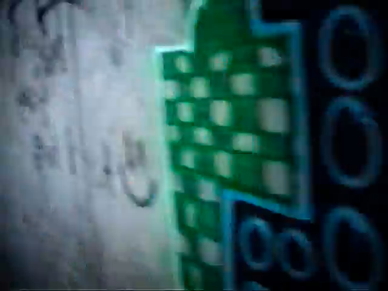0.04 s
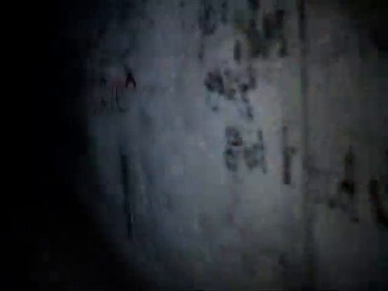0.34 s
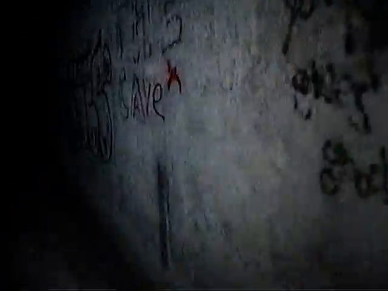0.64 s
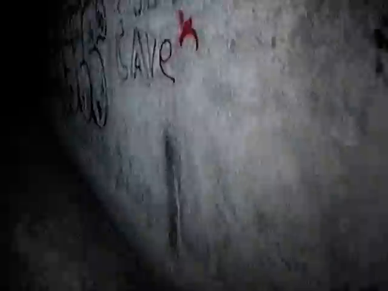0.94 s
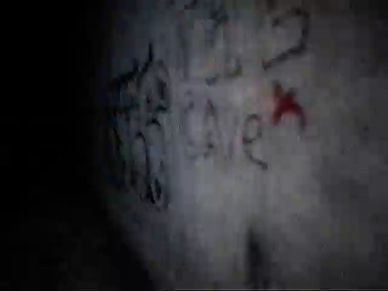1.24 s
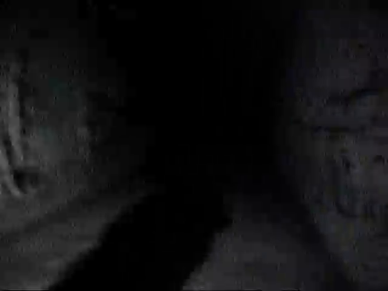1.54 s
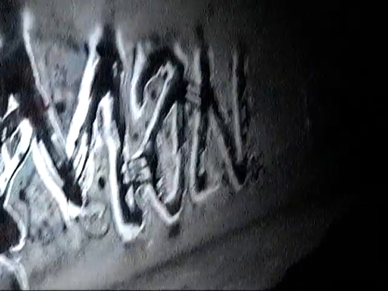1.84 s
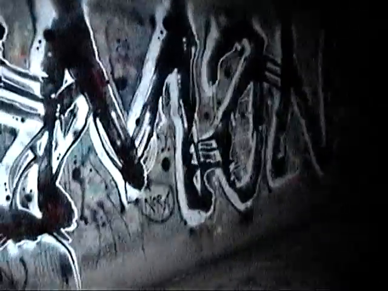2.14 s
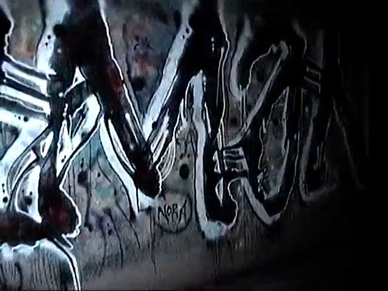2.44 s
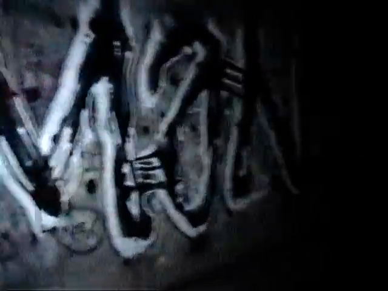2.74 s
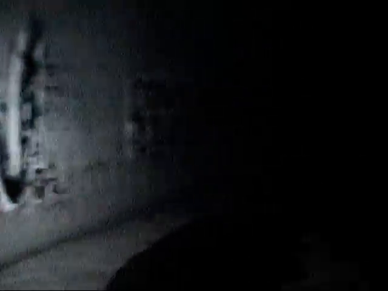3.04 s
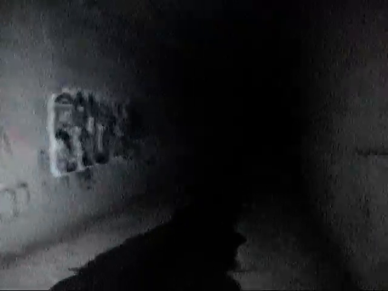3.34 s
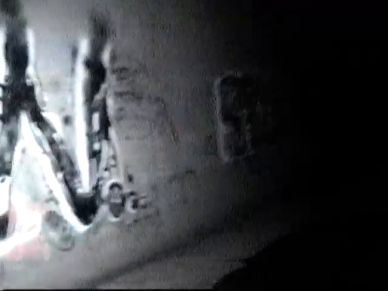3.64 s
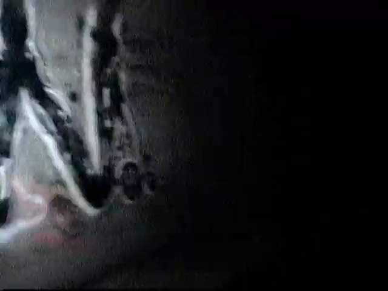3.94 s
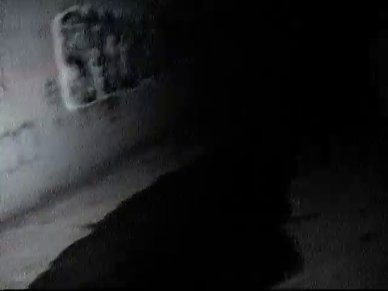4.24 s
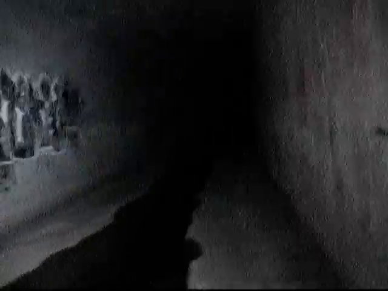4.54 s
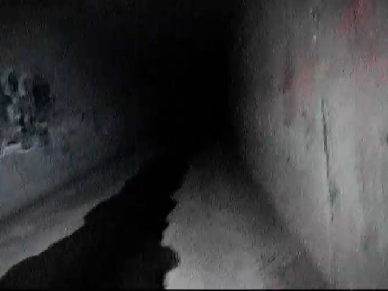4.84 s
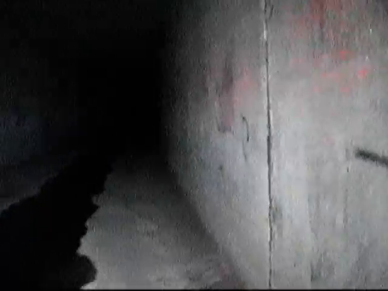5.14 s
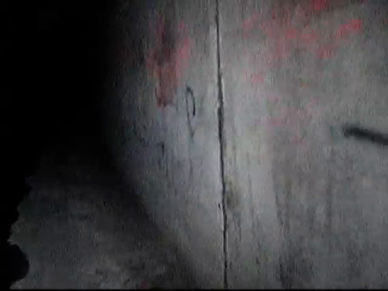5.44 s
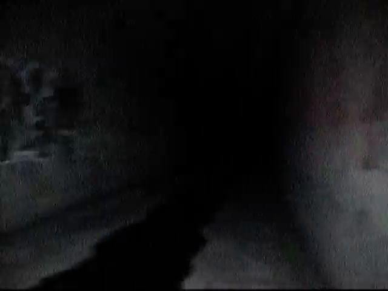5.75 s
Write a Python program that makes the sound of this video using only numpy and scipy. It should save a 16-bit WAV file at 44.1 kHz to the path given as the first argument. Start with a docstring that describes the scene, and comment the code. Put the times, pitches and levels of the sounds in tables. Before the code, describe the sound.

A steady, hollow wash of water fills a concrete drain while someone walks softly and something small ticks near the microphone.

```python
"""A steady hiss over a hollow, gurgling wash fills a concrete drain tunnel: water runs farther down, and
reverberation smears its splashes into noise. Someone walks slowly through, carrying a small camera, and a faint
rumble swells as it swings. Something small and hard, perhaps a strap clip, ticks on the case, ringing briefly
and echoing off the walls. Grit scuffs and ticks faintly, soft footfalls set the tunnel's air ringing, and one
soft, low thud sounds like a gurgle."""
import sys
import numpy as np
from scipy import signal
from scipy.fft import rfft, irfft, next_fast_len
from scipy.io import wavfile

SR = 44100
rng = np.random.default_rng(int(sys.argv[2]) if len(sys.argv) > 2 else 0)


def wrap_up_sound(samples):
    """Save the sound to the file named by the first command line argument, as 16-bit audio."""
    columns = np.atleast_2d(samples).T
    # keep every value between -1 and 1, then stretch to whole-number steps
    tamed = np.clip(columns, -1, 1)
    steps = np.round(tamed * 32767).astype(np.int16)
    wavfile.write(sys.argv[1], SR, steps)


N = 263714


def from_db(db):
    """Amplitude ratio: tenfold for every 20 dB."""
    return 10 ** (np.asarray(db) / 20)


def rms_one(x):
    """Normalisation to unit rms."""
    return x / np.sqrt(np.mean(x ** 2) + 1e-20)


def about_mean(points):
    """A time curve's deviation from its mean, interpolated to every sample."""
    curve = np.interp(np.arange(N) / SR, *np.transpose(points))
    return curve - curve.mean()


def at_hz(points, hz):
    """Interpolation on a log-frequency axis."""
    frequencies, values = np.transpose(points)
    return np.interp(np.log(hz), np.log(frequencies), values)


def add(out, s, sound):
    """Superposition of a sound starting at s seconds."""
    start = round(s * SR)
    out[..., start:start + sound.shape[-1]] += sound[..., :N - start]


def drift(rate_hz):
    """Slow random modulation: low-passed noise of unit rms."""
    hop, settle = 40, 2000
    pole = np.exp(-2 * np.pi * hop * rate_hz / SR)
    noise = rng.standard_normal(N // hop + settle + 2)
    slow = signal.lfilter([1], [1, -2 * pole, pole * pole], noise)[settle:]
    return np.interp(np.arange(N) / hop, np.arange(len(slow)), rms_one(slow))


def band(x, low_hz, high_hz):
    """Band-pass filtering with slopes of 12 dB per octave."""
    edges = [low_hz, min(high_hz, SR / 2 - 1)]
    return signal.sosfilt(signal.butter(2, edges, "band", fs=SR, output="sos"), x)


def resonate(x, hz, width_hz):
    """A damped oscillator driven by x, with unit gain at resonance."""
    r = np.exp(-np.pi * width_hz / SR)
    feedback = [1, -2 * r * np.cos(2 * np.pi * hz / SR), r * r]
    return signal.lfilter(np.array([1, 0, -1]) * (1 - r * r) / 2, feedback, x + 1e-18)


def two_ports(mid, side, hz):
    """Diffuse-field coherence: two close microphone ports agree in the bass, less in the treble."""
    # likeness of left and right: (frequency [Hz], correlation [ratio])
    coherence = [(60, 0.95), (120, 1), (300, 0.98), (800, 0.84), (2500, 0.89), (5000, 0.8), (8000, 0.28),
                 (12000, 0.062)]
    alike = np.clip(at_hz(coherence, hz), -1, 1)
    return np.sqrt(1 + alike) * mid + np.sqrt(1 - alike) * side * np.array([[1], [-1]])


def tunnel(x, build_s=0.013):
    """Reverberation: dense wall echoes build up, then decay exponentially, each band at its own rate."""
    # the tunnel's reverberation time: (frequency [Hz], time to fall 60 dB [s])
    t60 = [(200, 0.81), (1000, 0.7), (4000, 3.2), (8000, 0.088), (13000, 0.65)]
    t, edges, response = np.arange(SR) / SR, np.geomspace(100, 14000, 11), 0
    for low, high in zip(edges, edges[1:]):
        hz = np.sqrt(low * high)
        echoes = two_ports(*band(rng.standard_normal((2, len(t))), low, high), hz)
        response = response + echoes * np.exp(-np.log(1000) * t / at_hz(t60, hz))
    response = rms_one(response * (1 - np.exp(-t / build_s))) / np.sqrt(len(t))  # unit energy
    return signal.fftconvolve(x[None], response, axes=1)[:, :N]


def arrive(x, lag_ms, lean_db):
    """Time and level differences: the left port hears later; the case shades the right one's treble."""
    size = 2 * next_fast_len(N // 2 + 1)
    hz = np.linspace(0, SR / 2, size // 2 + 1)
    delay_s = np.array([[lag_ms], [0]]) / 1000
    phase = 2 * np.pi * np.minimum(hz, 8000) * delay_s  # stops growing at 8 kHz
    spectrum = rfft(x, size) * np.exp(-1j * phase)
    treble = irfft(spectrum * np.interp(hz, [4000, 7000], [0, 1]))[:, :N]
    lean = from_db(np.array([[.5], [-.5]]) * lean_db)
    return irfft(spectrum)[:, :N] - treble + treble * lean


def water_rush(level_db=-32.5, flicker_db=0.71, flicker_hz=9, swell_depth=1.1, fade_db_per_s=0.3,
               top_hz=10500):
    """Incoherent summation: countless far splashes merge into a hiss that falls away steeply above top_hz."""
    # spectral density of the rush: (frequency [Hz], relative level [dB])
    spectrum = [(60, -16.5), (115, -30), (170, -11), (240, -5), (450, -2), (1100, -2), (1700, -0.5),
                (2600, 1), (3700, -1.5), (5000, -5.5), (6400, -9), (8000, -20), (10000, -35),
                (12500, -29.5)]
    # contour of the water's hiss: (time [s], level [dB])
    flow = [(0.05, -34.5), (0.33, -32.5), (0.88, -34.5), (1.36, -32.5), (1.7, -32.5), (2.06, -34),
            (2.83, -32.5), (4.03, -34.5), (5.04, -32.5), (5.5, -34), (5.93, -32.5)]
    # top treble, highest with the microphone facing down the tunnel: (time [s], level [dB])
    treble = [(0.05, -47), (0.69, -49.5), (1.08, -48), (1.54, -46.5), (1.92, -47.5), (2.7, -49),
              (3.36, -46), (3.7, -47.5), (5.13, -45), (5.44, -46.5), (5.93, -45.5)]
    hiss_db, top_db = swell_depth * about_mean(flow), swell_depth * about_mean(treble)
    wash_db = -fade_db_per_s * (np.arange(N) - N / 2) / SR  # the hollow wash fades along the way
    edges, rush = 50 * 2 ** np.arange(0, 8.2, 1 / 3), 0  # third octaves
    white = rng.standard_normal((2, 2, N))
    for k, (low, high) in enumerate(zip(edges, edges[1:])):
        hz = np.sqrt(low * high)
        wash_share, top_share = at_hz([(700, 1), (1600, 0)], hz), at_hz([(2800, 0), (6500, 1)], hz)
        swell_db = wash_share * wash_db + top_share * top_db + (1 - wash_share - top_share) * hiss_db
        noise = two_ports(*band(white[k % 2], low, high), hz)
        rush = rush + noise * from_db(at_hz(spectrum, hz) + swell_db + flicker_db * drift(flicker_hz))
    low_pass = signal.butter(4, top_hz, fs=SR, output="sos")
    return from_db(level_db) * rms_one(signal.sosfilt(low_pass, rush))


def bubbles(low_hz, high_hz, level_db, per_s, cycles, spread_db=4, direct_db=-6):
    """Bubble resonance: each pocket of trapped air rings briefly, heard mostly off the walls."""
    strengths = from_db(spread_db * np.minimum(rng.exponential(1, N), 3)) * rng.choice([-1, 1], N)
    births = strengths * (rng.random(N) < per_s / SR)
    pitches = np.geomspace(low_hz, high_hz, 20)
    pitch_index = rng.integers(0, len(pitches), N)
    rings = sum(resonate(births * (pitch_index == k), hz, 2 * hz / cycles) / np.sqrt(hz)
                for k, hz in enumerate(pitches))
    return from_db(level_db) * rms_one(from_db(direct_db) * rings + tunnel(rings))


def air_rumble(low_hz=30, high_hz=170, rest_db=-63, swing_db=9,
               start_s=1.52, attack_s=0.57, hold_s=1.2, release_s=3.5):
    """Amplitude modulation: faint low noise rises, holds and sinks back as the camera swings."""
    corners = start_s + np.cumsum([0, attack_s, hold_s, release_s])
    swing = np.interp(np.arange(N) / SR, corners, [0, 1, 1, 0])
    air = two_ports(*band(rng.standard_normal((2, N)), low_hz, high_hz), np.sqrt(low_hz * high_hz))
    return from_db(rest_db + swing_db * swing) * rms_one(air)


def ticks(gain_db=-4.5, strike_db=5, ring_strike_db=17, thump_db=-9, bounce_s=0.0025, bounce_db=-12,
          snap_hz=(3700, 9200), body_hz=(2100, 3500), click_hz=(3600, 10400),
          click_echo_db=-14, tick_echo_db=-17):
    """Impact excitation: sharp ticks on the case and faint ticks of grit chatter, rebound and ring."""
    # sharp ticks on the case and faint ticks of grit; the rings and the bump are relative to the snap:
    # (time [s], level [dB], low ring [dB], high ring [dB], bump [dB], chatter decay [s])
    impacts = [(0.316, -29, -15, -8, -20, .002), (0.5846, -7.5, -23, -11, -16, 0.0019),
               (0.7837, -30, -15, -6, -20, .002), (1.1071, -8, -6, -8, -12, 0.0016),
               (1.1872, -20.5, -6, -8, -22, 0.0017), (2.0205, -24, -20, -18, -20, .0005),
               (2.0344, -29, -15, -6, -20, .001), (2.1053, -30.5, -15, -8, -20, .0006),
               (2.186, -28, -15, -2, -20, .001), (2.2255, -6.5, 7, 4.5, -3, 0.0016),
               (2.2308, -12, 16, -5, -22, .001), (2.2445, -24, -2, 0, -18, 0.0017),
               (2.2556, -8, 11, -14, -15, 0.0013), (2.27, -18, 0, -4, -15, 0.004),
               (2.277, -17, 6, 3, -18, .0015), (3.334, -4.5, 2, 1, -4, 0.0015),
               (3.388, -37, -6, 3, -20, .003), (3.428, -22, 9, -6, -18, .001),
               (4.6615, -29, -15, -8, -20, .0006), (5.5542, -4.2, -1, 3.5, -3, 0.0015),
               (5.5819, -17.5, -1, -7, -9, .004)]
    # modes of the tapping clip, three low and four high, colouring every tick: # (frequency [Hz], bandwidth
    # [Hz], level [dB])
    clip_modes = [(4054, 95, 0.5), (4520, 610, -3.5), (5675, 180, -7.5), (8050, 140, -1), (9300, 330, -9.5),
                  (10030, 230, -10), (11800, 1600, -9)]
    near, airborne, t = np.zeros(N), np.zeros(N), np.arange(SR // 10) / SR
    impulse = 1.0 * (t == 0)
    for s, tick_db, low_db, high_db, bump_db, decay_s in impacts:
        rebound = from_db(bounce_db) * (t > bounce_s) * np.exp(-abs(t - bounce_s) / decay_s)
        contact = np.exp(-t / decay_s) + rebound
        strength = from_db(tick_db + gain_db) * np.sqrt(np.mean(contact ** 2))
        snap, bump, push = from_db(strike_db) * impulse + contact * rng.standard_normal((3, len(t)))
        # a firm blow bumps the whole case
        clack = from_db(thump_db) * rms_one(band(bump, 24, 580)) + rms_one(band(bump, *body_hz))
        tick = rms_one(band(snap, *snap_hz)) + from_db(bump_db) * clack
        drive = push + from_db(ring_strike_db) * impulse
        for k, (hz, width_hz, mode_db) in enumerate(clip_modes):
            ring = (-1) ** k * rms_one(resonate(drive, hz, width_hz))
            # each tick has its own balance of low and high modes
            tick = tick + from_db(mode_db + (low_db if k < 3 else high_db)) * ring
        add(near, s, strength * rms_one(tick))
        add(airborne, s, strength * rms_one(band(impulse, *click_hz)))
    # a thin click and a little of the whole tick radiate into the tunnel
    echoes = tunnel(from_db(click_echo_db) * airborne + from_db(tick_echo_db) * near)
    return arrive(near + echoes, lag_ms=.037, lean_db=6)


def scuffs(gain_db=-2, grain_db=6, echo_db=-5):
    """Friction noise: sand grains of uneven size crackle under the sole."""
    # grit dragged under a shoe: (time [s], level [dB], rise time [s])
    drags = [(0.72, -52, .07), (0.87, -48, .025), (2.033, -52, 0.0076), (2.764, -46, .012),
             (3.379, -55, .03)]
    out, t = np.zeros(N), np.arange(SR // 2) / SR
    for s, scuff_db, rise_s in drags:
        grains = rng.standard_normal(len(t))
        grains *= from_db(grain_db * np.minimum(rng.exponential(1, len(t)), 4))
        envelope = t / rise_s * np.exp(1 - t / rise_s)
        add(out, s, from_db(scuff_db + gain_db) * rms_one(band(grains, 3800, 9500)) * envelope)
    return out + from_db(echo_db) * tunnel(out)


def steps_and_thud(gain_db=-1, knock_s=0.0021, sag_s=0.0024, slap_s=0.0032,
                   sole_s=0.022, sole_pitch_ratio=0.66, sole_width_hz=190,
                   wall_s=.021, wall_db=-15, echo_db=-9, hollow_db=-9, hollow_width_hz=55):
    """Damped impact: in a step the heel knocks and slaps, the sole thuds lower, the tunnel resonates."""
    # footfalls and, last, one soft low gurgle-like thud; slap and sole are relative to the heel:
    # (time [s], level [dB], final heel pitch [Hz], slap [dB], sole [dB], local tunnel resonance [Hz])
    thuds = [(1.015, -26, 382, -15, -16, 400), (2.194, -16, 500, -8, -23.5, 735),
             (2.765, -23.5, 334, -4, -14, 350), (3.2953, -18.5, 490, -4, -10.5, 524),
             (4.375, -30, 380, -14, -10, 420), (4.428, -18.5, 380, -8, -15, 455),
             (4.769, -27.5, 420, -12, -14, 440)]
    out, hollow, t = np.zeros(N), np.zeros(N), np.arange(SR // 4) / SR
    for s, step_db, heel_hz, slap_db, sole_db, hollow_hz in thuds:
        # rubber on concrete: a few cycles that sink in pitch as the heel flattens
        phase = 2 * np.pi * np.cumsum(heel_hz * (1 + np.exp(-t / sag_s))) / SR
        from_peak_s = t - 2 * knock_s  # zero when the heel presses hardest
        knock = np.exp(-(from_peak_s / knock_s) ** 2 / 2) * np.sin(phase)
        noise = rng.standard_normal(len(t))
        slap = np.exp(-abs(from_peak_s) / slap_s) * rms_one(band(noise, 460, 1400))
        heel = knock + from_db(slap_db) * slap
        roll = t / sole_s * np.exp(1 - t / sole_s)
        thud = rms_one(band(resonate(noise, sole_pitch_ratio * heel_hz, sole_width_hz), 190, 2000))
        strength = from_db(step_db + gain_db)
        step = strength * (heel + from_db(sole_db) * roll * thud)
        add(out, s, step)
        add(out, s + wall_s, strength * from_db(wall_db) * heel)  # reflection from the near wall
        add(hollow, s, np.std(step) * rms_one(resonate(step, hollow_hz, hollow_width_hz)))
    return out + tunnel(from_db(echo_db) * out + from_db(hollow_db) * hollow)


def scene():
    """Superposition of the distant water and the nearby walker."""
    trickle = bubbles(low_hz=1306, high_hz=4300, level_db=-44.5, per_s=500, cycles=17.0)
    gurgle = bubbles(low_hz=198.3, high_hz=826, level_db=-48.0, per_s=40, cycles=29)
    water = arrive(water_rush() + trickle + gurgle, lag_ms=.015, lean_db=2.5)
    return water + ticks() + steps_and_thud() + scuffs() + air_rumble()


def record(dry, ceiling=.36, cutoff_hz=12750, offset=.495):
    """Soft saturation and band limiting: the camera rounds peaks, cuts the top and adds a DC offset."""
    rounded = ceiling * np.tanh(dry / ceiling)
    low_pass = signal.ellip(10, .1, 90, cutoff_hz, fs=SR, output="sos")
    return offset + signal.sosfilt(low_pass, rounded)


dry = scene()
out = record(dry)
wrap_up_sound(out)
```